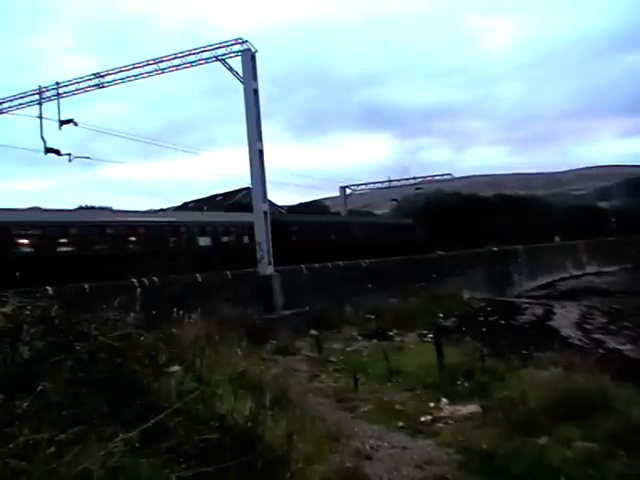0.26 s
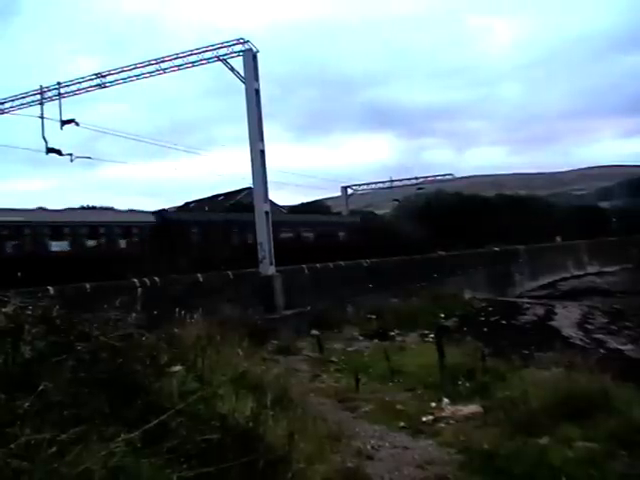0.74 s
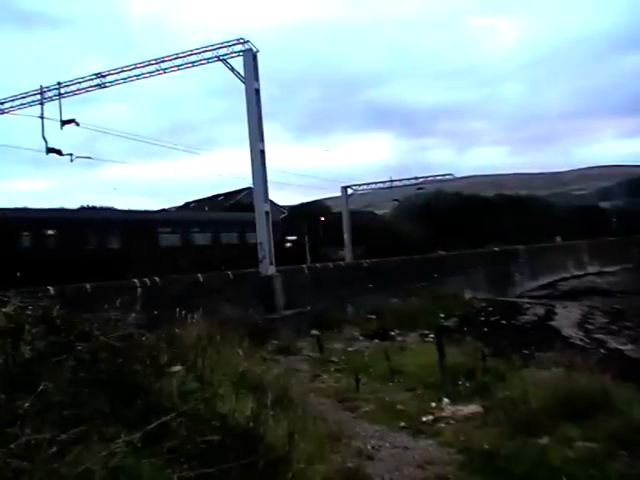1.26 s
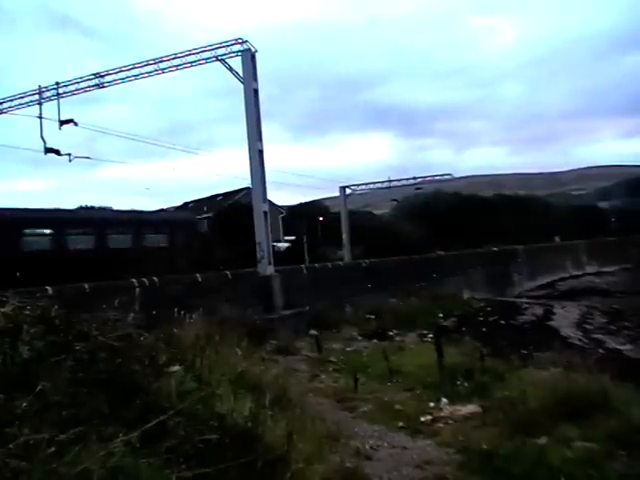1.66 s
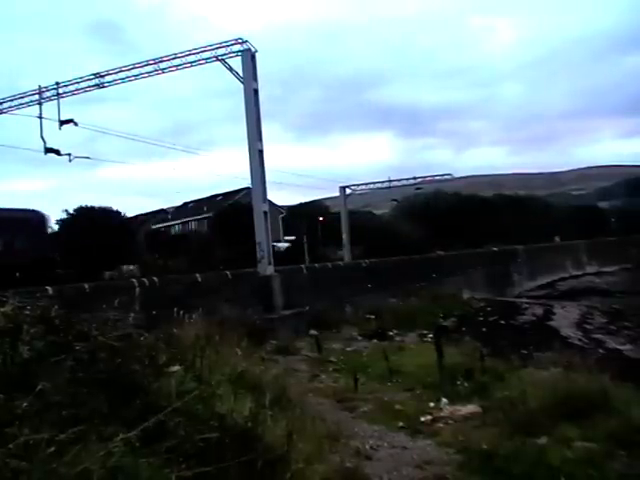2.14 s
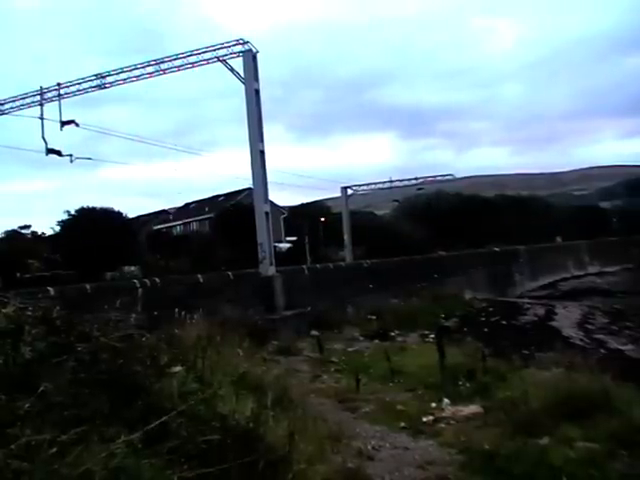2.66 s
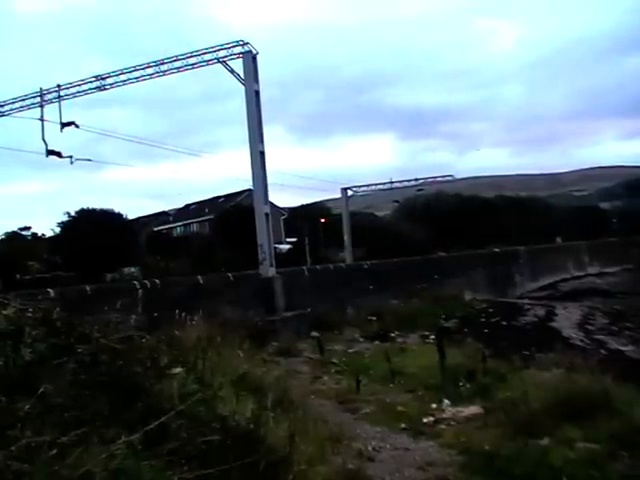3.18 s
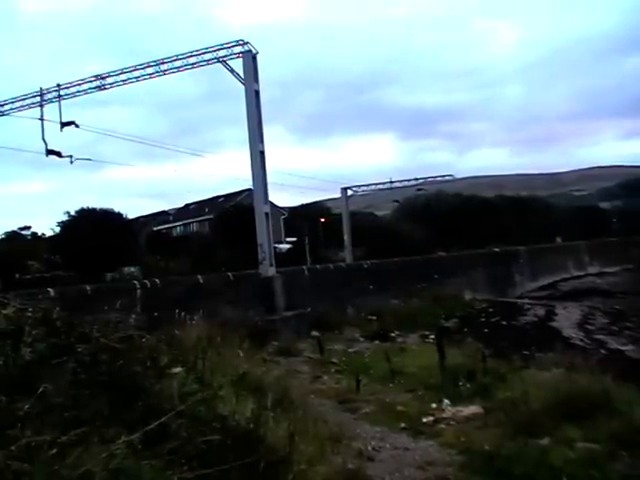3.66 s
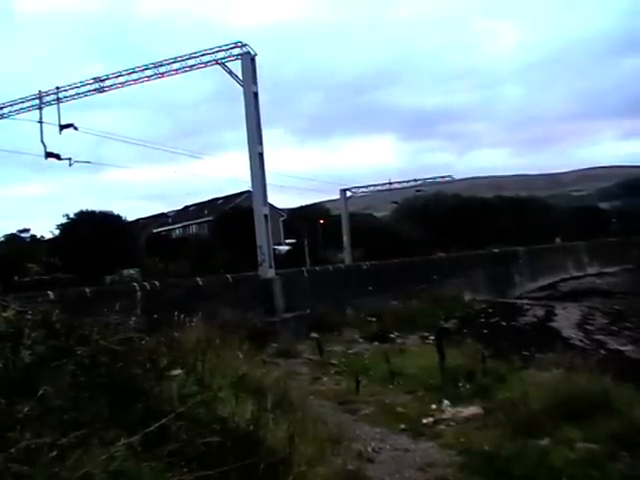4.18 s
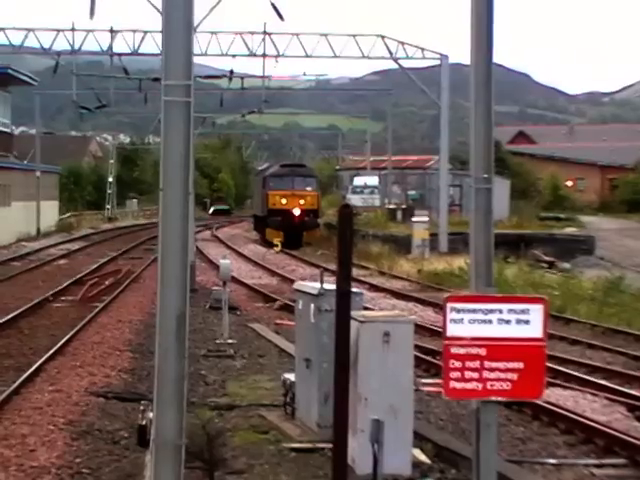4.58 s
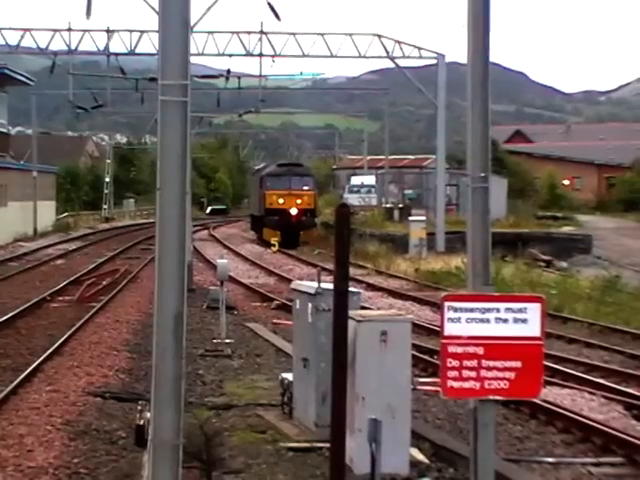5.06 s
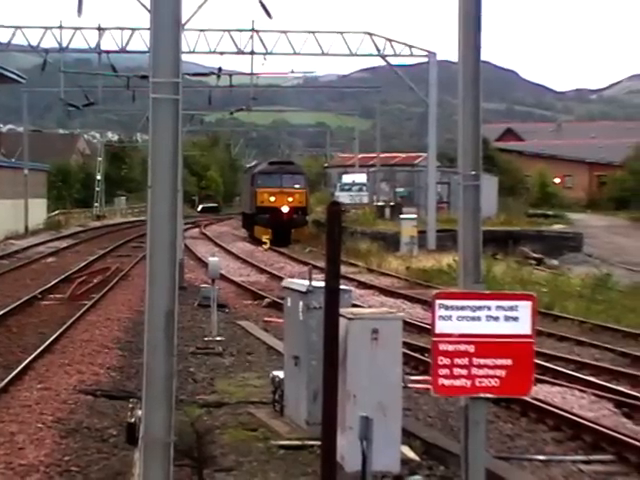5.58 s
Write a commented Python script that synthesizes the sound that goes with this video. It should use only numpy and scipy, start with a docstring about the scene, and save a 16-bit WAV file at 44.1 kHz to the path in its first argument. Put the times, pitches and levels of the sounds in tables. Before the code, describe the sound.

Loud rhythmic wheel clatter and rolling roar of a passing train recede, stop dead, and give way to soft open-air hush and faint engine throb.

```python
"""A railway beside a low wall: passenger coaches roll past at speed and draw away, then a quiet station yard.
Rolling is coloured noise that follows the train; every wheel strikes each rail joint with a crack, a clank,
a thump and a thud, and sets steel resonances ringing. Hum, rail song, scuffs and hollow knocks join in.
The train cuts off; after a very short silence comes open-air hush with a diesel locomotive idling far away,
made of steady tones, a fuzzy drone and a slow exhaust throb."""
import sys
import numpy as np
from scipy import signal
from scipy.fft import rfft, irfft
from scipy.io import wavfile
from scipy.ndimage import uniform_filter1d

SR = 44100
rng = np.random.default_rng(int(sys.argv[2]) if len(sys.argv) > 2 else 0)


def unload_wav(signal):
    """Save mono or channel-first audio to the path in sys.argv[1] as 16-bit WAV at rate SR, clipped to [-1, 1]."""
    wavfile.write(
        sys.argv[1],
        SR,
        np.round(np.clip(np.atleast_2d(signal).T, -1, 1) * 32767).astype(np.int16),
    )


N = 256653
TIME = np.arange(N) / SR
FREQS = np.fft.rfftfreq(N, 1 / SR)

# The train's path: t/s, pitch factor of the ringing steel (Doppler), view (0 = side-on, 1 = from behind)
PASSING = [(0, 0.96, 0.016), (.9, 1.016, 0), (1.7, 0.96, 0.02), (2.3, 0.98, 0.46), (3.0, .952, 0.67),
           (4.4, 0.93, 1)]
# Loudness of the rolling noise as the train goes by: t/s, relative level/dB
ROLLING_LEVEL = [(0.0, -16), (0.29, -17), (0.51, -18), (2.43, -17), (2.69, -18.5), (3.27, -19), (4.07, -23),
                 (4.2, -25)]
# Swells of the roar on rough rail: start t/s before the rough-rail delay, strength/dB
ROAR_SWELLS = [(-0.44, -4), (0, -18), (0.370, 0), (1.5, -8.5), (1.3, -1), (2.1, -7.5), (2.535, 0.5)]
# Time between the two swells of a pair, rough-rail delay, width of each swell (falls to 1/e)
PAIR_GAP_S, ROUGH_DELAY_S, SWELL_S = 0.139, 0.77, 0.1

# Colours of the rolling noise, from the shaking ground up to the hiss: f/Hz, relative level per Hz/dB
GROUND_COLOUR = [(10, -67), (28, -29), (42, -6.5), (65, 2.5), (95, 0), (135, -3.5), (190, -8), (300, -42),
                 (3000, -107)]
RUMBLE_COLOUR = [(40, -43), (90, -16), (130, -8), (165, -3.5), (205, -6.5), (255, -3.5), (345, -1.5),
                 (450, -8), (650, -22), (1500, -70), (8000, -100)]
ROAR_COLOUR = [(30, -61), (200, -15), (430, 2.5), (560, 5), (760, 5), (950, 1.6), (1400, -4.5),
               (1600, -9.5), (2400, -19), (6000, -74), (12000, -84.5)]
HISS_COLOUR = [(700, -4), (1500, 6), (2100, 4.5), (2800, -0.5), (3800, -4), (4300, -7), (5800, -10.5),
               (8000, -21.5), (10000, -30.5), (11500, -39), (14000, -49)]
# Droning bogies (wheel frames): f/Hz, width/Hz, relative level side-on/dB, relative level from behind/dB
FRAME_DRONES = [(262, 40, -11.5, -9), (343, 60, -7.5, -8)]
# The ground shakes less and less as the weight of the train moves off
GROUND_DB, GROUND_FADE_DB_PER_S = -30.5, 2.5
# Depth to which rattling gear shakes the roar and the hiss (0 = not at all)
ROAR_RATTLE, HISS_RATTLE = 0.45, 0.35

# Rail joints: travel t/s from the nearest joint, crack level/dB, thump level over crack/dB,
# clank level over crack/dB, ground thud level/dB, length of the blow t/s; levels are relative
JOINTS = [(0.0, -9.0, 0, 2.5, -19.5, 0.016), (0.494, -15.5, -6.5, 5, -19, 0.014),
          (0.966, -22, 1.5, 8, -22, 0.012), (1.477, -26.5, 4.5, 10.5, -20.5, 0.015)]
# Wheels, two to a bogie: t/s at the nearest joint, strength at each of the four joints/dB (four columns),
# clank level/dB, thump level/dB, thump f/Hz, lag of the thump t/s; levels are relative
WHEELS = [(0.370, -0.5, -12, -3.5, -6.5, -1, 1, 238, 0.00089),
          (0.509, -1.5, -2.5, -5, -10, -2, 4, 239, 0.00091),
          (0.690, -2.5, -4, -5, -6.5, 1, -1.5, 245, 0.0018), (0.831, -1, -3, -5, -4, -1, 2, 250, .005),
          (1.449, -2.5, -11, -3, -2, 1, -1.5, 256, 0.0095),
          (1.590, -1.5, -2.5, -5, -5, 0, -2.5, 258, 0.0051), (1.774, -0.5, -4, -3.5, -2, -1, -1, 248, .007),
          (1.913, -0.5, -2, 0.5, -2, -1, 3, 251.5, 0.0031), (2.535, -0.5, 2, 0.5, 0, 0, 2, 269, 0.0079),
          (2.674, -0.5, -1, 2.5, 2, -2, 0.5, 292, 0.00086)]
# Resonances of bogie and sleepers: multiple of the pitch, time to die by 60 dB t/s, relative level/dB
BOGIE_MODES = [(1, 0.1, 0.5), (1.17, 0.07, -9), (1.45, 0.087, -9)]
# Resonances of the ballast (the stones below): same columns
BALLAST_MODES = [(1, 0.14, 0), (0.69, 0.16, -5), (1.41, 0.13, -0.5)]
THUD_HZ = 120  # middle pitch of the ballast thud
# Colours of a blow's bright crack and of its clank: f/Hz, relative level per Hz/dB
CRACK_COLOUR = [(500, 6), (1500, 5), (2100, 5.5), (3000, 2), (3900, 3), (4500, -1.5), (6000, -5),
                (8000, -13.5), (11000, -26), (14000, -38.5)]
CLANK_COLOUR = [(150, 8), (400, 4.5), (750, -1.5), (1100, 9), (1400, 9), (2000, 3), (4500, -32),
                (12000, -86)]
# Build-up time of clank and force, clank's lag behind the crack, grinding time before the gap
BLOW_RISE_S, CLANK_LAG_S, APPROACH_S = 0.0033, 0.0025, 0.032
CHATTER_DB = 2  # unevenness of the small impacts in one blow

# Resonances of wheel and rail: f/Hz, width/Hz, relative level/dB rolling side-on,
# relative level/dB rolling seen from behind, relative level/dB when struck
STEEL_MODES = [(812, 127, -9.5, 3.5, -3.5), (1063, 80, -11, -3.5, -5), (1279, 69, -0.7, -15, -3.5),
               (1394.5, 63, -1, -11.5, -2), (1883, 144, -5, -2.5, -3), (2077, 120, -5, -8.5, -11),
               (2520, 110, -5.5, -23, -9.5), (3190, 340, -10, -11.5, -5), (3814, 280, -20.5, -21.5, -5.5)]
# Own tones of each wheel, one row a wheel, five tones a row: f/Hz, level/dB
WHEEL_TONES = [
    [(1469, -18.5), (1886, -31), (2538, -37), (3028, -35), (3700, -25)],
    [(1405, -18.5), (1857, -22), (2589, -28.5), (3076, -28.5), (3830, -32)],
    [(1370, -18), (1792, -20), (2586, -29), (2990, -26), (3660, -30)],
    [(1430, -17.5), (1808, -30), (2435, -31), (3133, -27.5), (3827, -23)],
    [(1243, -16), (1927, -23), (2427, -31), (3092, -34), (3814, -30)],
    [(1378, -22), (1860, -30), (2452, -32), (3110, -33), (3881, -27)],
    [(1378, -18), (1838, -29), (2435, -33), (3208, -31), (3835, -32)],
    [(1378, -33), (1868, -24.5), (2460, -29), (3291, -29), (3740, -35)],
    [(1359, -29), (1781, -23), (2430, -30), (3120, -35), (3878, -28)],
    [(1259, -28), (1814, -28), (2520, -33), (3071, -30), (3765, -34)],
]
# How long each of the five tones takes to die by 60 dB: t/s
WHEEL_T60_S = [0.4, .42, .38, 0.44, 0.33]
# Narrow hum of the coaches: t/s, f/Hz, relative level/dB
COACH_HUM = [(0, 330, -25), (.17, 335, -23.5), (0.24, 292, -23.5), (.33, 290, -23), (.43, 290, -36.5),
             (0.62, 320, -34), (0.79, 322, -22), (.97, 318, -29), (1.1, 278, -26.5), (1.25, 248, -25.5),
             (1.35, 290, -25.5), (1.43, 325, -27), (1.6, 312, -30.5), (1.68, 275, -27.5), (1.8, 320, -25),
             (2.05, 303, -25), (2.25, 272, -25), (2.45, 266, -25), (2.66, 295, -25), (2.8, 280, -34.5),
             (2.92, 280, -23.5), (3.12, 280, -33.5), (3.35, 285, -28.5), (3.65, 345, -30), (3.9, 300, -34),
             (4.08, 270, -28.5), (4.3, 290, -38)]
# Song of the rail: t/s, f/Hz, level/dB
RAIL_SONG = [(0, 1890, -44), (2.2, 1850, -36.5), (2.54, 1790, -34), (2.8, 1810, -41), (3.35, 1795, -31),
             (3.49, 1780, -32), (3.6, 1775, -48), (3.82, 1765, -40), (3.95, 1755, -47), (4.12, 1740, -32.5),
             (4.22, 1716, -50)]

# Wheel flanges scuff the rail: t/s, relative level/dB, half length t/s
SCUFFS = [(.1, -32, .05), (1.135, -30.5, 0.027), (1.27, -32, 0.028), (2.21, -29, 0.019), (2.35, -26, .028),
          (3.291, -25.5, 0.023), (3.329, -26.5, .015), (3.437, -28.5, .018)]
# Colour of a scuff: f/Hz, relative level per Hz/dB
SCRAPE_COLOUR = [(800, -37), (1800, 2.5), (3000, 6), (4500, -5.5), (6500, -5), (8000, -15), (10500, -38),
                 (14000, -57)]
# Average number of tiny slips in a second of scuffing, and their level within it
SLIPS_PER_S, CRACKLE_DB = 1100, -3
# Hollow knocks, many as wheels cross the farther joints, and a last small tick:
# t/s, relative level/dB, f/Hz, relative click level/dB
KNOCKS = [(.361, -22, 890, -21.5), (.91, -12.5, 321.6, -29), (1.002, -11, 1043, -27),
          (1.125, -13, 1260, -24), (1.219, -8, 1140, -29), (1.322, -8, 1240, -27), (2.085, -16, 600, -27),
          (2.27, -12, 790, -19.5), (2.353, -13, 699.2, -26), (2.41, -7.5, 1200, -25),
          (2.544, -9, 1030, -30), (2.68, -12, 1240, -27), (2.735, -4.5, 723, -28), (2.876, -10, 642, -31),
          (3.324, -16, 896, -29), (3.501, -3.5, 850, -27.5), (3.637, -10, 850, -31), (3.657, -13, 350, -33),
          (4.016, -11, 900, -38), (4.16, -12.5, 950, -37), (4.32, -32, 3520, -34)]

# Train, likeness of the two ears: f/Hz, likeness (kept within 0-1)
TRAIN_SAME = [(60, 0.4), (130, 0.6), (280, 1.2), (620, 1), (1340, 0.85), (2920, 0.9), (6350, 1.1),
              (13800, 0.6)]
# Train, louder side: f/Hz, left minus right level/dB
TRAIN_SIDE = [(60, 3.5), (86, 1.5), (120, 0.0), (180, -0.5), (260, -0.5), (370, -1.0), (530, 0.0),
              (760, 0.5), (1090, 5), (1570, 5.5), (2250, 5.0), (3240, 5.0), (4650, 6), (6680, 3.0),
              (9600, -2), (13800, -1.5)]
# Train, lead of the left ear: f/Hz, phase/rad
TRAIN_LEAD = [(100, -1), (280, -0.03), (560, 0.34), (950, 0.61), (2580, 0.22), (9500, 0.3), (11500, 2.3)]

# Colour of the yard's hush: f/Hz, relative level per Hz/dB
YARD_COLOUR = [(10, -55), (25, -26), (55, -8), (170, -7), (235, -3.5), (295, -4), (350, -10), (780, 0.5),
               (1350, -7.5), (1650, -13), (2150, -11.5), (3100, -20.5), (4100, -30), (5200, -29.5),
               (7000, -35.5), (10000, -49)]
YARD_DB = -36.5  # level of the hush before its slow drift
# Resonances of the idling engine: f/Hz, width/Hz, relative level/dB
ENGINE_MODES = [(773, 89, 6.8), (856, 60, 7.5)]
# Steady tones of the engine: f/Hz, level/dB
ENGINE_TONES = [(750, -52), (782, -51.5), (868, -54), (1184, -53.5)]
# Exhaust throb: its first peak, time between peaks, level at the peak
FIRST_THROB_S, THROB_GAP_S, THROB_DB = 4.737, 0.302, -42
# Yard, likeness of the two ears: f/Hz, likeness (0-1)
YARD_SAME = [(60, 0.75), (130, 1), (280, 0.96), (620, 0.99), (1340, 0.94), (2920, 0.93), (6350, 0.87),
             (13800, 0.26)]
# Yard, louder side: f/Hz, left minus right level/dB
YARD_SIDE = [(60, 0.0), (110, -0.5), (200, -1.0), (370, -1.5), (670, -1), (1230, -0.75), (2250, 0.5),
             (4120, 0.0), (7540, -0.5), (13800, 0.0)]

# Faint steady whine under both parts: f/Hz, peak level/dB
WHINE = [(10500, -82), (12000, -76)]
CUT_OUT_S, CUT_IN_S = 4.379, 4.437  # the train is gone; the yard begins
EDGE_HZ = 14300  # upper limit of the sound


def amp(db):
    """Turns decibels into gain."""
    return 10 ** (np.asarray(db) / 20)


def unit(x):
    """Scales a sound to an average strength (rms) of 1."""
    return x / np.sqrt(np.mean(x ** 2) + 1e-20)


def read(points, hz):
    """Reads a table between its rows, along a log-frequency axis."""
    f, value = np.transpose(points)
    return np.interp(np.log(hz + 1), np.log(f + 1), value)


def add(mix, s, sound):
    """Mixes a sound in at time s."""
    part = mix[max(round(s * SR), 0):][:len(sound)]
    part += sound[:len(part)]


def colour(x, spectrum):
    """Filters a sound to a given colour, at rms 1."""
    return unit(irfft(rfft(x) * amp(read(spectrum, FREQS)), N))


def noise(spectrum):
    """Steady noise of a given colour."""
    return colour(rng.standard_normal(N), spectrum)


def drift(rate):
    """Slow random wandering, mostly at up to rate changes a second, rms about 1."""
    coarse = TIME[::64]
    hz = np.fft.rfftfreq(len(coarse), coarse[1])
    keep = (hz > 1) / (1 + (hz / rate) ** 4)
    slow = irfft(rfft(rng.standard_normal(len(coarse))) * keep, len(coarse))
    return np.interp(TIME, coarse, unit(slow))


def ring(x, modes, factor):
    """Steep resonances, excited by x, whose pitch follows a factor; each adds its share of the power."""
    out = np.zeros(N)
    turns = np.cumsum(factor * np.ones(N)) / SR
    for hz, width, db in modes:
        turn = np.exp(2j * np.pi * hz * turns)
        r = np.exp(-np.pi * abs(width) / SR)
        gain = np.sqrt((1 - r * r) ** 3 / (1 + r * r))
        # shift the resonance down to 0 Hz, filter there, then shift it back
        filtered = signal.lfilter([gain], [1, -2 * r, r * r], x / turn + 1e-18)
        out += amp(db) * (turn * filtered).real
    return out


def scatter(x, t60):
    """Sparse reflections of random sign, dying away by 60 dB in t60 seconds."""
    t = np.arange(SR // 2) / SR
    present = rng.random(len(t)) < 1 / 20
    taps = rng.choice([-1, 1], len(t)) * present * amp(-60 * t / t60)
    return signal.fftconvolve(x, taps / np.linalg.norm(taps))[:N]


def stereo(x, same, side, lead=0):
    """Direct sound, shifted in level and phase between the ears, plus diffuse sound that differs there."""
    likeness = np.clip(read(same, FREQS), 0, 1)
    tilt_db = read(side, FREQS) / 2
    direct = rfft(x) * np.sqrt((1 + likeness) / 2)
    diffuse = rfft(scatter(x, t60=0.24)) * np.sqrt((1 - likeness) / 2)
    gains = amp([tilt_db, -tilt_db]) * np.exp(0.5j * np.array([[1], [-1]]) * lead)
    ears = np.array([direct + diffuse, direct - diffuse])
    return irfft(ears * gains / abs(gains).mean(0), N)


def rattle(per_s, spread_db, decay):
    """Uneven envelope of many small impacts, a few of them large."""
    size_db = spread_db * np.minimum(rng.exponential(1, N), 3)
    size = amp(size_db) * (rng.random(N) < per_s / SR)
    impacts = np.sqrt(signal.lfilter([1], [1, -np.exp(-1 / (decay * SR))], size ** 2))
    return unit(uniform_filter1d(impacts, size=90))


def passing():
    """Doppler pitch factor and view of the train at every moment."""
    s, *columns = np.transpose(PASSING)
    return [np.interp(TIME, s, column) for column in columns]


def on_rough_rail(half_s, second_db):
    """Pairs of swells of the roar on rough rail; the second of a pair is shifted in level."""
    swell = np.zeros(N)
    for s, db in ROAR_SWELLS:
        for lag, shift_db in ((0, 0), (PAIR_GAP_S, second_db)):
            centre_s = s + lag + ROUGH_DELAY_S
            swell += amp(db + shift_db) * np.exp(-((TIME - centre_s) / half_s) ** 2)
    return swell


def rolling_level(db, behind_db, swell_db):
    """Gain of one part of the rolling: follows the train and its view, and swells on rough rail."""
    _, behind = passing()
    swell = on_rough_rail(SWELL_S, second_db=-0.7)
    train_db = np.interp(TIME, *np.transpose(ROLLING_LEVEL))
    return amp(train_db + db + behind_db * behind + swell_db * swell)


def rolling():
    """Rough wheels on rough rails: ground and bogies rumble, track roars and hisses; also the steel force."""
    _, behind = passing()
    ground_level = amp(GROUND_DB - GROUND_FADE_DB_PER_S * TIME)
    rumble_level = rolling_level(db=-7.0, behind_db=0.7, swell_db=1.04)
    roar_level = rolling_level(db=-5.5, behind_db=2.0, swell_db=2.0)
    hiss_level = rolling_level(db=-9.0, behind_db=-4.5, swell_db=2.5)
    clatter = rattle(per_s=120, spread_db=2.9, decay=0.004)
    shake = unit(1 + HISS_RATTLE * clatter) * amp(0.41 * drift(rate=5.3))

    ground = ground_level * noise(GROUND_COLOUR)
    rumble = amp(0.84) * rumble_level * noise(RUMBLE_COLOUR) * amp(0.5 * drift(rate=28))
    frames = [(hz, width, side + (back - side) * behind) for hz, width, side, back in FRAME_DRONES]
    drone = rumble_level * ring(rng.standard_normal(N), frames, 1 + 0.03 * drift(rate=6.5))
    # loose gear shakes the middle range most
    roar = amp(0.54) * roar_level * noise(ROAR_COLOUR) * unit(1 + ROAR_RATTLE * clatter)
    hiss = amp(0.37) * hiss_level * noise(HISS_COLOUR) * shake
    rubbing = amp(-4.5) * np.sqrt(roar_level * hiss_level) * shake
    return ground + rumble + drone + roar + hiss, rubbing


def blow(t, length, rise, tail_db, tail_t60):
    """Envelope of a cluster of small impacts as parts strike and chatter, with a tail that settles."""
    smooth = (1 - np.exp(-t / rise)) * (np.exp(-(t / length) ** 4) + amp(tail_db - 60 * t / tail_t60))
    chatter = unit(signal.fftconvolve(rng.standard_normal(len(t)), np.hanning(220), "same"))
    rough = smooth * amp(CHATTER_DB * chatter)
    return rough * np.linalg.norm(smooth) / np.linalg.norm(rough)  # keep the energy


def swing(t, hz, modes, rise):
    """A heavy body is pushed and swings a few times; peak 1."""
    wave = np.zeros(len(t))
    for ratio, t60, db in modes:
        wave += amp(db - 60 * t / t60) * np.sin(2 * np.pi * (hz * ratio * t + rng.random()))
    wave = wave * (1 - np.exp(-(t / rise) ** 2))
    return wave / abs(wave).max()


def joints():
    """A wheel dropping into a gap gives crack, clank, bogie thump and ground thud; also the steel force."""
    t = np.arange(SR // 3) / SR
    crack, clank, body, force = np.zeros((4, N))
    for start, *strengths_db, own_clank_db, weight_db, bogie_hz, lag in WHEELS:
        for joint, wheel_db in zip(JOINTS, strengths_db):
            delay, joint_db, thump_db, clank_db, thud_db, length = joint
            s, db = start + delay, joint_db + wheel_db
            add(crack, s, amp(db) * blow(t, length, rise=0.0019, tail_db=-6.0, tail_t60=0.28))
            clank_blow = blow(t, length, BLOW_RISE_S, tail_db=-9, tail_t60=0.19)
            add(clank, s + CLANK_LAG_S, amp(db + clank_db + own_clank_db) * clank_blow)
            add(force, s, amp(db) * blow(t, length, BLOW_RISE_S, tail_db=-5.5, tail_t60=0.44))
            # the wheel grinds harder and harder on the battered rail end before the gap
            approach = amp(db) * np.linspace(0, 1, round(APPROACH_S * SR))
            add(force, s - APPROACH_S, amp(-3.5) * approach)
            add(clank, s - APPROACH_S, amp(-6.5) * approach)
            thump = swing(t, bogie_hz, BOGIE_MODES, rise=0.0043)
            add(body, s + lag, amp(db + thump_db + weight_db) * thump)
            thud = swing(t, THUD_HZ * rng.uniform(0.847, 1.15), BALLAST_MODES, rise=0.0071)
            add(body, s, amp(thud_db + wheel_db) * thud)
    blows = amp(-10.0) * crack * noise(CRACK_COLOUR) + amp(-8) * clank * noise(CLANK_COLOUR) + body
    return blows, amp(-12) * force


def steel(rubbing, striking):
    """Wheel and rail sing when rubbed and ring when struck; their wavering pitch follows the Doppler shift."""
    doppler, behind = passing()
    rolled = [(hz, width, side + (back - side) * behind + 2.04 * drift(rate=12.5))
              for hz, width, side, back, _ in STEEL_MODES]
    struck = [(hz, width, db) for hz, width, _, _, db in STEEL_MODES]
    sung = ring(rubbing * rng.standard_normal(N), rolled, doppler * (1 + 0.0058 * drift(rate=4.1)))
    rung = ring(striking * rng.standard_normal(N), struck, doppler * (1 + 0.012 * drift(rate=5.9)))
    return sung + rung


def ringing():
    """After the nearest joint each wheel rings on in tones of its own, unsteadily as it keeps rolling."""
    t, out = np.arange(SR // 2) / SR, np.zeros(N)
    for k, t60 in enumerate(WHEEL_T60_S):
        unsteady = amp(2 * drift(rate=35)) * np.exp(0.65j * drift(rate=35))  # level and phase
        tones = np.zeros(N, complex)
        for (s, *_), row in zip(WHEELS, WHEEL_TONES):
            hz, db = row[k]
            envelope = amp(db - 60 * t / t60) * (1 - np.exp(-(t / 0.008) ** 2))
            add(tones, s, envelope * np.exp(2j * np.pi * (hz * t + rng.random())))
        out += (tones * unsteady).real
    return out


def tone(points, width_hz, waver, clean):
    """A narrow resonance, part steady tone and part randomly rubbed, along rows of t/s, f/Hz, level/dB."""
    s, hz, db = np.transpose(points)
    pitch = np.interp(TIME, s, hz) * (1 + waver * drift(rate=8.8))
    steady = np.sqrt(2) * np.sin(2 * np.pi * np.cumsum(pitch) / SR)
    rubbed = unit(ring(rng.standard_normal(N), [(1, width_hz, 0)], pitch))
    level = amp(np.interp(TIME, s, db) + 1.2 * drift(rate=11))
    return level * unit(clean * steady + (1 - clean) * rubbed)


def singing():
    """The rolling coaches hum, a little weaker seen from behind, and the rail sings high above them."""
    _, behind = passing()
    hum = tone(COACH_HUM, width_hz=27, waver=0.015, clean=0.42) * amp(-1.5 - 2.5 * behind)
    return hum + tone(RAIL_SONG, width_hz=68, waver=0.0099, clean=0.1)


def scrapes():
    """Gritty swells of hiss as flanges scuff the rail, crackling with tiny slips."""
    contact = sum(amp(db) * np.exp(-((TIME - s) / half_s) ** 2) for s, db, half_s in SCUFFS)
    slips = rng.standard_normal(N) * (rng.random(N) < SLIPS_PER_S / SR)
    crackle = colour(slips, SCRAPE_COLOUR)
    grit = amp(-2) * noise(SCRAPE_COLOUR) + amp(CRACKLE_DB) * crackle
    return contact * grit * rattle(per_s=260, spread_db=0.5, decay=0.0094)


def knocks():
    """Hollow knocks of three resonances, many as wheels cross the farther joints, each with a dry click."""
    t, out, click = np.arange(SR // 10) / SR, np.zeros(N), np.zeros(N)
    for s, db, hz, click_db in KNOCKS:
        modes = sum(share * np.sin(2 * np.pi * ratio * hz * t)
                    for ratio, share in ((1, 1), (1.23, 0.6), (1.57, 0.28)))
        cycles = hz * t  # timed in cycles, so higher-pitched knocks die sooner
        add(out, s, amp(db - 2.05 * cycles) * (1 - np.exp(-cycles / 0.42)) * modes)
        add(click, s, amp(click_db) * blow(t, 0.005, 0.0006, tail_db=-8, tail_t60=0.05))
    return out + click * noise(CRACK_COLOUR)


def yard():
    """Open-air hush and a far diesel: a fuzzy drone and steady tones with a slow exhaust throb."""
    hush = amp(YARD_DB) * noise(YARD_COLOUR) * amp(0.41 * drift(rate=11))
    drone = amp(-43.5) * unit(ring(rng.standard_normal(N), ENGINE_MODES, 1))
    throb_times = np.arange(FIRST_THROB_S, N / SR, THROB_GAP_S)
    beat = amp(THROB_DB) * sum(np.exp(-((TIME - s) / 0.029) ** 2) for s in throb_times)
    exhaust_hz = 229
    exhaust = np.sqrt(2) * np.sin(2 * np.pi * exhaust_hz * TIME + 0.45 * drift(rate=35))
    tones = sum(amp(db) * np.sqrt(2) * np.sin(2 * np.pi * hz * TIME + 1.0 * drift(rate=9.7))
                for hz, db in ENGINE_TONES)
    return hush + drone + tones + beat * exhaust


def scene():
    """The train with its echoes off wall and ground, a short silence, then the yard."""
    wash, rubbing = rolling()
    blows, striking = joints()
    train = wash + blows + steel(rubbing, striking) + ringing() + singing() + scrapes() + knocks()
    train = train + amp(-15) * scatter(train, t60=0.55)
    train_ears = stereo(train, TRAIN_SAME, TRAIN_SIDE, read(TRAIN_LEAD, FREQS))
    yard_ears = stereo(yard(), YARD_SAME, YARD_SIDE)
    leaving = np.clip((CUT_OUT_S - TIME) / 0.023, 0, 1)
    arriving = np.clip((TIME - CUT_IN_S) / 0.0084, 0, 1)
    whine = sum(amp(db) * np.sin(2 * np.pi * hz * TIME) for hz, db in WHINE)
    return leaving * (train_ears + whine) + arriving * (yard_ears + whine)


def record(dry):
    """Sheds the deepest bass, clips at full scale, then removes the highest treble."""
    low_cut_hz = 39
    thin = signal.sosfilt(signal.butter(4, low_cut_hz, "highpass", fs=SR, output="sos"), dry)
    band_limit = signal.firwin(511, EDGE_HZ, window=("kaiser", 9), fs=SR)
    return signal.oaconvolve(np.clip(thin, -1, 1), band_limit[None], "same")


dry = scene()
out = record(dry)
unload_wav(out)
```